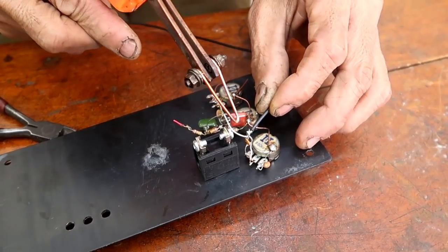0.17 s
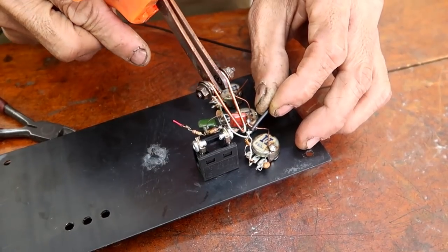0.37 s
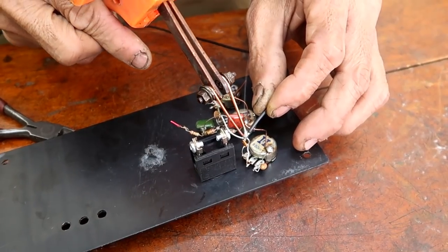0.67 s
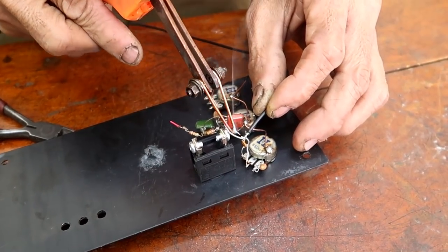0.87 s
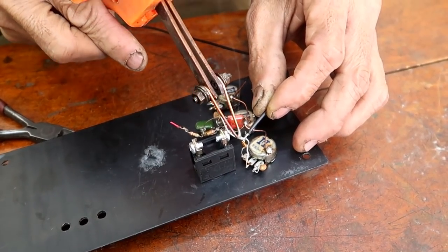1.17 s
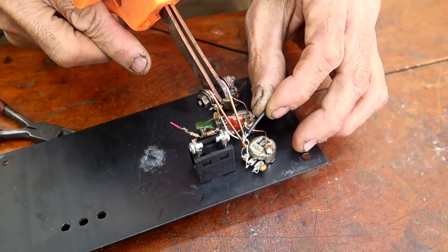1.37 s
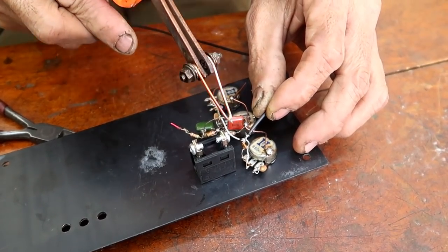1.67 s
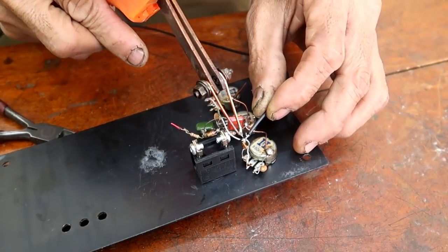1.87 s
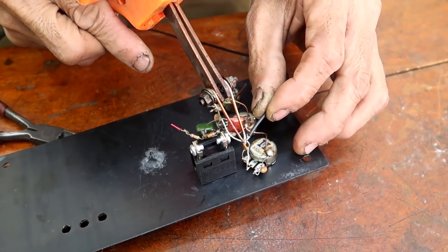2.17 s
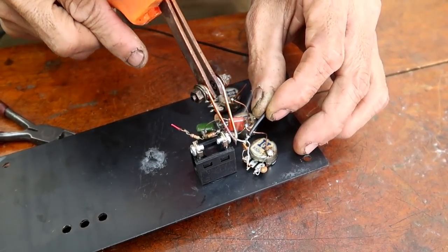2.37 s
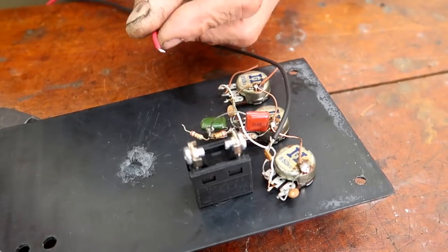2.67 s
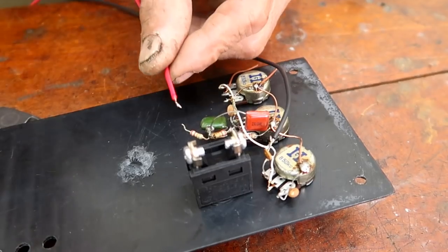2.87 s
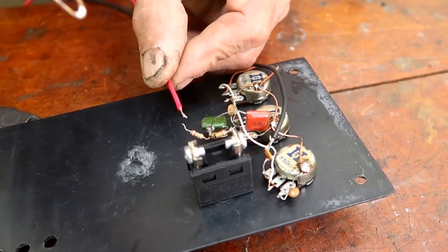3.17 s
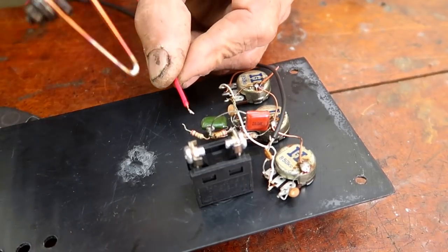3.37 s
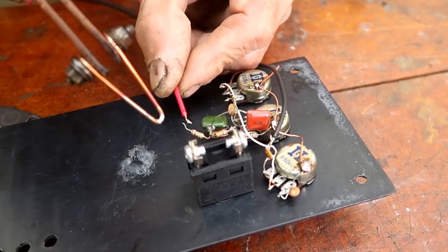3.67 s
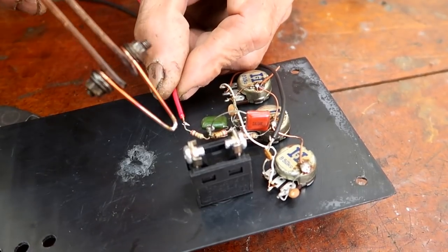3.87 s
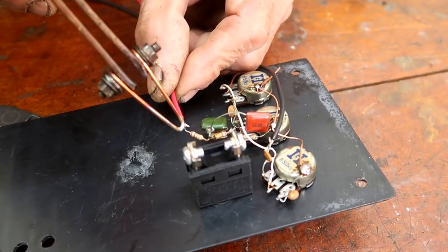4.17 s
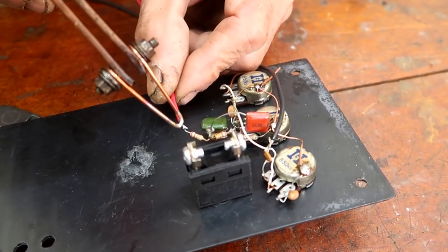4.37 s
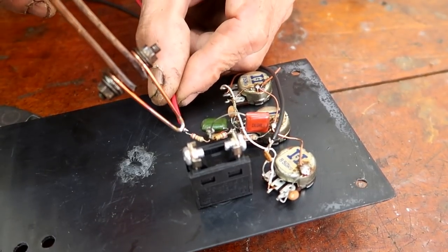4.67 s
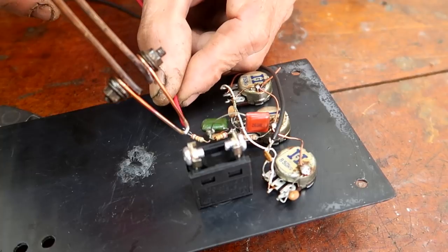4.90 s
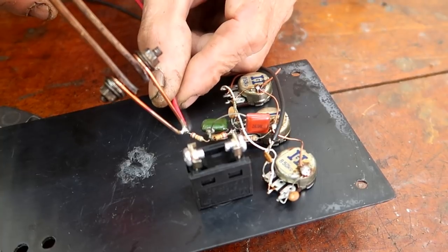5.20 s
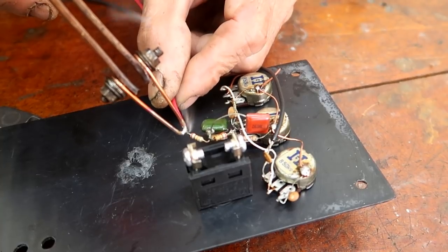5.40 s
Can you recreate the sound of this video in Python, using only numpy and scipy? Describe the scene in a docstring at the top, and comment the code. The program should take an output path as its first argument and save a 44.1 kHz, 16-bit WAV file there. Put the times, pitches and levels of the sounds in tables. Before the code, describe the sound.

Three harsh 100-hertz buzzes with sharp trigger clicks, a hard slam and rattle between the second and third, over faint birdsong and distant engine rumble.

```python
"""A buzzing soldering gun on a bench

A transformer soldering gun buzzes in three bursts: its core plates slap twice per mains cycle and shake the casing.
Its trigger clicks on and off, and once it is put down hard; soft bumps, thuds and rattles come from the bench.
Birds chirp outside an open shed and a far engine drones over rumble and thin air, made of coloured noise.
Two spaced microphone ports pick it up; the level drops out briefly at 2.58 s and the background changes.
"""
import sys
import numpy as np
from scipy import signal
from scipy.fft import rfft, irfft, next_fast_len
from scipy.io import wavfile
from scipy.ndimage import uniform_filter1d, map_coordinates

SR = 44100
rng = np.random.default_rng(int(sys.argv[2]) if len(sys.argv) > 2 else 0)


def pcm_store(signal):
    """Save signal as 16-bit PCM."""
    levels = np.round(np.clip(np.atleast_2d(signal), -1, 1) * 32767)
    wavfile.write(sys.argv[1], SR, levels.astype(np.int16).T)


def magnitude_from_level(level_db):
    """Linear magnitude for a level in decibels (20 dB per decade)."""
    exponent = np.asarray(level_db, float) / 20
    return 10 ** exponent


N = 244252
T = np.arange(N) / SR
SIDE = np.array([[.5], [-.5]])  # left and right port: each takes half of a difference

# The sound drops out and comes back: (time [s], level [dB])
DROPOUT = [(2.5833, 2), (2.5835, -16), (2.597, 8.5), (2.611, -0.5)]
# How much earlier the gun reaches the left port: before the dropout, after it [s]
GUN_LAG_S = [0.000372, 4.5e-5]
# Resonances of the bench top: (frequency [Hz], level [dB], time to fade by 60 dB when struck [s])
BENCH_MODES = [(250, -6, .026), (330, -2, .026), (440, 2, .028), (700, -6, .016), (1200, -2, .012),
               (1630, 1, .014), (2100, -1, .011), (2900, -6, .01), (3700, -6, .01), (4700, -8, .01),
               (5300, -10, .01), (7350, -18, .01)]


def unit(x):
    """Scale a signal to rms 1."""
    return x / np.sqrt(np.mean(x ** 2) + 1e-20)


def along(points, hz):
    """Read a curve of (Hz, value) points on a log frequency axis."""
    f, v = np.transpose(points)
    return np.interp(np.log(hz + 1), np.log(f + 1), v)


def curves(rows):
    """One value per sample for each column after the time."""
    s, *cols = np.transpose(rows)
    return [np.interp(T, s, c) for c in cols]


def wobble(rate, size=N):
    """A smooth random curve through `rate` random points a second."""
    points = rng.standard_normal(int(size * rate / SR) + 4)
    return map_coordinates(points, [np.arange(size) * rate / SR])


def moved(before, after):
    """One value or signal up to the dropout, another after it."""
    return np.where(T < DROPOUT[1][0], before, after)


def filtered(x, response):
    """Filter x by a complex response, given as a function of frequency."""
    m = next_fast_len(x.shape[-1] + 8192)
    return irfft(rfft(x, m) * response(np.fft.rfftfreq(m, 1 / SR)), m)[..., :x.shape[-1]]


def resonance(f, centre, width):
    """Response of a damped mass on a spring: 1 at its centre, falling on both sides (all in Hz)."""
    return 1j * f * width / (centre ** 2 - f * f + 1j * f * width)


def add(track, s, sound):
    """Mix a sound in at time s."""
    part = track[..., round(s * SR):][..., :sound.shape[-1]]
    part += sound[..., :part.shape[-1]]


def ports(x, pan_db, lag_s):
    """A source as the two ports hear it: louder by pan_db and earlier by lag_s on the left."""
    return filtered(x, lambda hz: magnitude_from_level(SIDE * pan_db) * np.exp(2j * np.pi * hz * lag_s * SIDE))


def blend(pair, alike, spectrum=((1, 0),)):
    """Mix two unrelated signals into left and right of a given likeness and colour."""
    def shares(hz):
        angle = np.arccos(np.clip(along(alike, hz), -1, 1)) / 2
        return magnitude_from_level(along(spectrum, hz)) * [np.cos(angle), np.sin(angle)]

    mid, side = filtered(pair, shares)
    return np.array([mid + side, mid - side])


def echoes(x, t60s, alike, size=SR // 4):
    """A diffuse tail per port, each frequency dying at its own speed, drawn anew every size samples."""
    out = np.zeros((2, N))
    for start in range(0, N, size):
        hz, t, z = signal.stft(rng.standard_normal((2, SR)), SR, nperseg=256)
        fade = magnitude_from_level(-60 * t / along(t60s, hz)[:, None])
        tail = blend(signal.istft(z * fade, SR, nperseg=256)[1], alike)
        tail = tail / np.linalg.norm(tail[0])
        # the tail begins 8 ms after the sound
        add(out, start / SR + .008, signal.fftconvolve(x[None, start:start + size], tail, axes=1))
    return out


def ring(modes, t, scatter_db):
    """Struck resonances that ring and fade, each at a new random strength."""
    hz, db, t60 = np.transpose(modes)[:, :, None]
    db = db + scatter_db * rng.standard_normal(hz.shape)
    return magnitude_from_level(db - 60 * t / t60) * np.sin(2 * np.pi * hz * t)


def rush(spectrum, patchy_db):
    """Coloured stereo noise of rms 1, with patches of random gain in time and frequency."""
    # Left-right likeness before and after the dropout, a list each: (frequency [Hz], likeness [-1 to 1])
    likeness = [
        [(60, 0.49), (380, -0.081), (2380, -0.13), (15000, -0.18)],
        [(60, 1.0), (180, 0.94), (550, 0.14), (1650, 0.27), (4970, 0.22), (15000, 0.01)],
    ]
    z = signal.stft(rng.standard_normal((2, N)), nperseg=512)[2]
    field = uniform_filter1d(rng.standard_normal(z.shape[1:]), size=6, axis=0)
    field = uniform_filter1d(field, size=14, axis=1)
    pair = signal.istft(z * magnitude_from_level(patchy_db * unit(field)), nperseg=512)[1][:, :N]
    before, after = [blend(pair, alike, spectrum) for alike in likeness]
    return unit(moved(before, after))


def background():
    """Low rumble and thin outdoor air are noise; the engine is a wavering tone at its firing rate and its double."""
    # Slow course of the levels: (time [s], rumble level [dB], air level [dB])
    floor = [(0, -52.5, -53.5), (.2, -50, -58.5), (2.3, -49, -57.5), (2.85, -50, -55), (5.54, -48, -56)]
    # Colour of the rumble, then of the air: (frequency [Hz], relative level per Hz [dB])
    rumble_colour = [(12, -65), (22, -14), (45, -3), (71, -2.5), (135, -8), (163, -9), (232, -12.5),
                     (325, -15), (500, -19.5), (650, -59), (1100, -120)]
    air_colour = [(180, -37), (300, -17), (415, -21), (556, -13), (820, -12.5), (965, -12), (1050, -15),
                  (1470, -17.5), (2210, -19.5), (3370, -22.5), (5840, -28.5), (14500, -41)]
    rumble_db, air_db = curves(floor)
    # each pair: before the dropout, after it
    firing_hz = 83.5 + moved(4.13, 1.24) * wobble(25.1)
    swell_db = moved(2, 3.25)
    turn = 2 * np.pi * np.cumsum(firing_hz) / SR
    firing = magnitude_from_level(moved(-56.5, -49) + swell_db * wobble(7)) * np.sin(turn)
    double = magnitude_from_level(moved(-55.5, -70) + swell_db * wobble(7.43)) * np.sin(2 * turn)
    drone = firing + double
    drone = moved(ports(drone, pan_db=1.5, lag_s=0.0014), drone)
    rumble = magnitude_from_level(rumble_db) * rush(rumble_colour, patchy_db=1.15)
    return rumble + magnitude_from_level(air_db) * rush(air_colour, patchy_db=1.5) + drone


def birds():
    """Each note is a gliding tone of wavering pitch and strength, heard directly and through the yard's echoes."""
    # Clear, level whistles: (time [s], length [s], pitch [Hz], level [dB])
    whistles = [(0.623, 0.11, 4300, -63), (0.884, 0.078, 4270, -63), (0.905, 0.14, 3754, -61),
                (1.239, 0.047, 3900, -52.5), (2.807, 0.19, 3370, -55), (3.151, 0.069, 4400, -56.5),
                (3.241, 0.051, 4287, -53.5), (3.459, 0.091, 4100, -53.5), (3.642, 0.046, 2630, -60),
                (3.682, 0.039, 3010, -60), (3.796, 0.065, 2940, -50)]
    # Hoarse, gliding chirps: (time [s], length [s], start pitch [Hz], end pitch [Hz], level [dB])
    chirps = [(0, 0.021, 3680, 3600, -61.5), (0.161, 0.094, 3400, 3500, -68),
              (0.378, .07, 4290, 4300, -57.5), (0.349, 0.13, 2660, 3320, -59),
              (0.499, 0.19, 4600, 4480, -60), (0.702, 0.066, 4450, 4980, -57.5),
              (0.765, 0.14, 4000, 3610, -59), (1.003, .043, 3300, 2900, -60),
              (1.103, .075, 3430, 2900, -56.5), (1.2, 0.056, 3110, 3800, -63.5),
              (1.475, 0.088, 3400, 3480, -67), (3.078, 0.076, 5000, 4440, -59),
              (3.369, 0.091, 4600, 5300, -54), (3.466, 0.08, 5300, 5050, -66),
              (3.593, 0.14, 4240, 4200, -54), (3.725, 0.11, 4360, 3180, -53),
              (3.994, 0.14, 3500, 3210, -51.5)]
    # One nearer bird repeats the same rising cheep: (time [s], level [dB])
    cheeps = [(1.864, -43.5), (2.106, -46), (2.334, -45.5)]
    # Echoes of the yard: (frequency [Hz], time to fade by 60 dB [s])
    yard = [(2000, 1), (6000, 0.56)]
    clear_hz, hoarse_hz, cheep_hz = 51.6, 205, 174  # how far the pitch wavers
    notes = [(s, length, hz, hz, db, clear_hz) for s, length, hz, db in whistles]
    notes += [(*row, hoarse_hz) for row in chirps]
    notes += [(s, 0.034, 3650, 4000, db, cheep_hz) for s, db in cheeps]
    out = np.zeros(N)
    for s, length, from_hz, to_hz, db, waver_hz in notes:
        u = np.linspace(0, 1, round(length * SR))
        hz = from_hz + (to_hz - from_hz) * u + waver_hz * wobble(457.2, size=len(u))
        strength = magnitude_from_level(db + 3.9 * wobble(60.0, size=len(u))) * np.sin(np.pi * u) ** 0.62
        add(out, s, strength * np.sin(2 * np.pi * np.cumsum(hz) / SR))
    direct = magnitude_from_level(2.5) * ports(out, pan_db=-1.0, lag_s=-0.000056)
    return direct + magnitude_from_level(1.0) * echoes(out, yard, alike=[(1, 0.022)])


def bumps():
    """Soft bumps, and one faint high hiss at the start: noise through the board, each around its own pitch."""
    # The hiss, then the bumps: (time [s], level [dB], length [s], centre [Hz], left minus right [dB])
    noises = [(0.03, -76, 0.54, 6760, 1), (0.061, -64, 0.086, 660, -2.5), (0.135, -66, 0.051, 850, -1.5),
              (0.725, -62.5, 0.19, 540, 2), (0.991, -63, 0.039, 880, -8), (2.344, -55, 0.033, 890, -0.5),
              (2.373, -47, 0.0096, 750, 8.5), (2.384, -55, 0.015, 695, -14), (2.866, -49.5, 0.045, 1200, 3),
              (2.946, -50.5, 0.01, 298, 0), (2.999, -48.5, 0.13, 1110, -0.5), (3.178, -61, 0.013, 1670, -5),
              (2.878, -47, 0.024, 417, 1), (2.993, -59, 0.052, 2550, 1), (4.802, -51.5, 0.19, 656, 0),
              (4.949, -42, 0.037, 975, -0.5), (4.964, -48, 0.028, 507, 2.5), (5.128, -46.5, 0.043, 768, 2)]

    def board(f):
        # resonances broader than those of the struck board, with alternating signs
        return sum((-1) ** k * magnitude_from_level(db) * resonance(f, c, 5 / t60) for k, (c, db, t60) in enumerate(BENCH_MODES))

    out = np.zeros((2, N))
    for s, db, length, hz, pan_db in noises:
        u = np.arange(round(length * SR) + 2000) / (length * SR)
        swell = np.sin(np.pi * np.clip(u, 0, 1) ** 0.62)
        grit = rng.standard_normal(len(u)) * magnitude_from_level(1.8 * wobble(185, size=len(u))) * swell
        sound = filtered(grit, lambda f: board(f) * resonance(f, hz, 1.1 * hz) ** 3)
        add(out, s, magnitude_from_level(db) * ports(unit(sound), pan_db, lag_s=1.5e-5))
    return out


def trigger():
    """The switch snaps over and rebounds once; so small a part gives no bass."""
    # Resonances of the trigger plastic: (frequency [Hz], level [dB], time to fade by 60 dB [s])
    plastic = [(1404, 5.5, 0.021), (1650, -1.5, 0.028), (1990, -24, 0.0039), (2550, 3, 0.0059),
               (2900, 0, 0.013), (3400, -4.5, 0.012), (4400, -3.5, 0.007), (5300, -2.5, 0.011),
               (5760, -3.5, 0.012), (6970, -12, 0.019), (9340, -14.5, 0.012)]
    # It takes up its slack, snaps on, snaps off: (time [s], peak level before the bass is cut [dB])
    slack = [(0.4148, -29.5), (4.0323, -25.5)]
    snap_on = [(0.4536, -20.5), (2.002, -20.5), (4.154, -14.5)]
    snap_off = [(0.868, -14.5), (2.5564, -18)]
    # Colour of those three kinds: (modes over 5 kHz [dB], modes under 2 kHz [dB])
    colours = [(-6.5, -2), (0.5, -10), (-7, -18)]
    out, t = np.zeros(N), np.arange(1500) / SR
    hz = np.transpose(plastic)[0][:, None]
    kinds = zip([slack, snap_on, snap_off], colours)
    clicks = [(*row, *colour) for rows, colour in kinds for row in rows]
    for s, db, treble_db, low_db in clicks:
        tilt_db = np.where(hz > 5000, treble_db, np.where(hz < 2000, low_db, 0))
        snap = (magnitude_from_level(tilt_db) * ring(plastic, t, scatter_db=2)).sum(0)
        snap += magnitude_from_level(treble_db - 5.5 - 60 * t / 0.009) * rng.standard_normal(len(t))  # broad crack
        snap *= (1 - np.exp(-t / 0.00051)) * (1 + .5 * wobble(1650, size=len(t)))  # gritty contact
        snap *= magnitude_from_level(db) / np.abs(snap).max()
        add(out, s, snap)
        add(out, s + 0.0095, magnitude_from_level(-17.5) * snap)  # rebound
    return filtered(out, lambda f: (1j * f / (700 + 1j * f)) ** 2)


def drive(on, off, loose, settle):
    """One sharp slap per half mains cycle; loose plates slap unevenly and rattle after it."""
    slap_hz = 100.285
    t = T[round(on * SR):round(off * SR)]
    cycle = t * slap_hz + .24
    whole = np.arange(np.ceil(cycle[0]), cycle[-1])[:, None]
    size_db, shift = rng.standard_normal((2, len(whole), 1))
    # each slap is a short windowed sinc, so that it can fall between two samples
    at = (whole - cycle[0]) / slap_hz * SR + 3 * loose * shift
    taps = np.floor(at) + np.arange(-7, 9)
    shape = np.sinc(taps - at) * np.cos(np.pi * (taps - at) / 16) ** 2 * magnitude_from_level(6 * loose * size_db)
    slaps = np.bincount(np.clip(taps, 0, len(t) - 1).astype(int).ravel(), shape.ravel(), len(t))
    after_slap = .28 + magnitude_from_level(-28 * (cycle % 1))
    rattle = rng.standard_normal(len(t)) * after_slap * magnitude_from_level(5 * loose * wobble(40, size=len(t)))
    share = np.clip(loose + (1 - loose) * np.exp(-(t - on) / settle), 0, 1)  # the inrush shakes the plates
    return t, np.sqrt(1 - share) * unit(slaps) + np.sqrt(share) * unit(rattle)


def casing(shake, modes, sway_db, lag_s):
    """The shaking through the gun's steep resonances, each with its own time shift, direction and slow sway."""
    out = 0
    for k, (c, width, db, ms, pan_db) in enumerate(modes):
        def mode(f):
            shift_s = ms / 1000 - SIDE * lag_s
            return resonance(f, c, 1.5 * width) ** 2 * np.exp(-2j * np.pi * f * shift_s)

        level = magnitude_from_level(db + SIDE * pan_db + sway_db * wobble(8.3, size=len(shake)))
        out = out + (-1) ** k * level * filtered(shake, mode)
    return unit(out)


def buzz():
    """The core shakes the casing for as long as the trigger is held."""
    # Trigger held: (on [s], off [s], looseness of the plates [0 to 1], time to settle [s])
    bursts = [(.458, .868, .3, .04), (2.004, 2.556, .35, .04), (4.158, 5.6, .1, .06)]
    # Level of each burst [dB]
    burst_db = [-50, -49.5, -43.5]
    # Casing resonances, gun pointing down, then held flat, and that of one loose plate: (frequency [Hz],
    # width [Hz], level [dB], time shift against the slap, later or earlier [ms], left minus right [dB])
    steep = [(850, 130, -1, 0.32, 0.5), (2150, 220, -6.5, 1.68, 0), (2433, 35, -1.5, 1.5, 16),
             (2750, 78, -6, 1.6, -11), (3070, 140, -4.5, 1.46, 1), (3383, 93, 0.5, 1.39, 3),
             (4000, 220, -11.5, 0, -13), (4600, 200, -5, 0.16, 8.5), (5190, 190, -19, 0.05, -6),
             (5800, 390, -10, 0.12, -6), (6370, 480, -13, 0.29, 11.5), (7220, 150, -14.5, 0.3, -5),
             (8240, 300, -12, 0, -1.5), (9530, 1100, -17, 0, 2), (11500, 130, -14.5, 0.28, 6),
             (12400, 400, -20, 0.14, 1), (13600, 3500, -31, 0, -3)]
    flat = [(850, 100, -2.5, 1.5, 1), (1075, 84, -5.5, 3, 1), (1490, 194, -10.5, 3.5, 0.81),
            (1820, 100, -7, -2.5, 1), (2204, 90, -2.5, 4, 1), (2338, 88, -2.5, 5, 1),
            (2492, 77, -1, 1.8, 1), (2725, 69, -6, 4, 1), (2940, 220, -12.5, 3.5, 1),
            (3400, 240, 1, 2.5, 1), (3613, 113, -4.5, 3.5, 1), (4600, 810, -11, 0, 1),
            (5300, 250, -8, -0.5, 1), (6340, 650, -6.5, 1.5, 1), (7790, 240, -7, -1.5, 1),
            (8620, 390, -13, -3, 1), (10400, 1000, -6, -1.5, 1), (12300, 280, -25, -18, 1),
            (13600, 350, -17.5, -0.5, 1)]
    plate_mode = [(1627, 150, 0, 0.049, 1.5)]
    # The plate sings in the two bursts with the gun pointing down: level in each [dB]
    plate_levels = [-56, -56.5]
    # Gaps in the plate's 1.6 kHz tone: (time [s], depth [dB], half width [s])
    tone_gaps = [(.658, 35, .026), (.764, 14, .014), (2.04, 6, .015), (2.494, 8, .015)]
    out = np.zeros((2, N))
    rows = zip(bursts, burst_db, [steep, steep, flat], [*plate_levels, -np.inf])
    for burst, db, modes, plate_db in rows:
        on, _, loose, _ = burst
        t, shake = drive(*burst)
        lag_s = GUN_LAG_S[int(on > DROPOUT[0][0])]
        sound = magnitude_from_level(db) * casing(shake, modes, sway_db=.5 + 4 * loose, lag_s=lag_s)
        gaps_db = sum(depth * np.exp(-((t - s) / width) ** 2) for s, depth, width in tone_gaps)
        plate = casing(shake, plate_mode, sway_db=2.1, lag_s=GUN_LAG_S[1])
        sound += magnitude_from_level(plate_db - gaps_db) * plate
        add(out, on, np.clip((t - on) / 0.00048, 0, 1) * sound)
    return out


def thuds():
    """A soft, uneven push rings the few low resonances of the bench frame."""
    # Dull thuds: (time [s], level of the push [dB], length [s])
    pushes = [(1.918, -52, 0.062), (2.375, -41, 0.013), (4.28, -50, 0.051), (4.978, -37, 0.037),
              (5.043, -39, 0.023), (5.146, -41, 0.066)]
    # Resonances of the frame: (frequency [Hz], width [Hz], level [dB])
    frame_modes = [(174, 47, -16.5), (210, 13, 1), (243.6, 38, -0.5), (348, 60, -16.5)]
    push = np.zeros(N)
    for s, db, length in pushes:
        u = np.linspace(0, 1, round(length * SR))
        add(push, s, magnitude_from_level(db) * np.sin(np.pi * u ** 0.34) * rng.standard_normal(len(u)))

    def frame(f):
        modes = sum((-1) ** k * magnitude_from_level(db) * resonance(f, c, w) for k, (c, w, db) in enumerate(frame_modes))
        return modes / (1 + 1j * f / 450) ** 2  # dulled above 450 Hz

    return filtered(push, lambda f: frame(f) / np.sqrt(np.mean(np.abs(frame(f)) ** 2)))


def slam():
    """A faint 5 ms hiss leads in, then the gun lands: a crack and the short ring of the board."""
    # Gun put down: (time [s], peak level before the bass is cut [dB])
    slam_s, slam_db = (2.6214, 2.6)
    out, t = np.zeros(N), np.arange(3000) / SR
    # a hard corner drives the high modes a little more
    hard = (np.transpose(BENCH_MODES)[0][:, None] / 1000) ** .13
    blow = (hard * ring(BENCH_MODES, t, scatter_db=1)).sum(0)
    blow += .25 * magnitude_from_level(-60 * t / .008) * rng.standard_normal(len(t))  # crack
    blow *= 1 - np.exp(-t / .0008)
    add(out, slam_s, blow / np.abs(blow).max() * magnitude_from_level(slam_db))
    lead_in = filtered(rng.standard_normal(240), lambda f: resonance(f, 2600, 2500))
    add(out, slam_s - .0055, magnitude_from_level(-32) * np.linspace(.3, 1, 240) * unit(lead_in))
    return filtered(out, lambda f: (1j * f / (185 + 1j * f)) ** 4)  # a thin board radiates no deep bass


def clatter():
    """Loose parts rattle: dense, throbbing grit, part dull and part bright, swells to each jolt and settles."""
    # Jolts: (time of the peak [s], level [dB], rise before it [s])
    jolts = [(2.639, -26, 0.0047), (2.882, -43, 0.0062), (2.954, -47.5, .012), (3.066, -48.5, 0.06)]
    settle_db_per_s, bright_share = 91.5, 0.53
    grit = rng.standard_normal((2, N)) * magnitude_from_level(2.4 * wobble(70))

    def band(f, top_hz):
        return 1j * f / (250 + 1j * f) / (1 + 1j * f / top_hz) ** 5

    dull = unit(filtered(grit[0], lambda f: band(f, 1270)))
    bright = unit(filtered(grit[1], lambda f: band(f, 4130)))
    shaking = 0
    for s, db, rise in jolts:
        settling = magnitude_from_level(db - settle_db_per_s * np.maximum(T - s, 0))
        shaking = shaking + np.clip(1 + (T - s) / rise, 0, 1) * settling
    return shaking * ((1 - bright_share) * dull + bright_share * bright)


def scene():
    """Gun and bench are near, in the echoing shed; birds and background are far."""
    # Direction of the slam: (frequency [Hz], left minus right [dB])
    slam_pan = [(60, -4), (380, -1.5), (700, 2), (1800, 3.5), (4400, 2.5), (15000, -1.5)]
    # Echoes of the shed: (frequency [Hz], time to fade by 60 dB [s])
    shed = [(150, 0.21), (500, 0.5), (2000, 0.56), (5000, 0.24), (12000, 0.2)]
    # Left-right likeness of those echoes: (frequency [Hz], likeness [-1 to 1])
    shed_alike = [(300, 0.98), (1500, 0.87), (5000, 0.87)]
    gun, switch, blow = buzz(), trigger(), slam()
    soft = bumps() + thuds() + ports(clatter(), pan_db=0.7, lag_s=3e-5)
    landed = filtered(ports(blow, 0, lag_s=GUN_LAG_S[1]), lambda hz: magnitude_from_level(SIDE * along(slam_pan, hz)))
    near = gun + ports(switch, pan_db=3.5, lag_s=2.8e-5) + landed + soft
    wet = magnitude_from_level(-18) * switch + magnitude_from_level(-16.0) * blow + magnitude_from_level(-12.5) * soft[0]
    hum = magnitude_from_level(-14) * echoes(gun[0], shed, shed_alike, size=N)  # one unchanging tail for the steady buzz
    return near + echoes(wet, shed, shed_alike) + hum + birds() + background()


def top_cut(x):
    """Nothing passes above the cut-off."""
    return signal.sosfilt(signal.butter(12, 16450, fs=SR, output="sos"), x)


def record(dry):
    """The level drops out briefly, loud peaks are softly flattened, and the treble ends near 15.6 kHz."""
    dropout_db, = curves(DROPOUT)
    heard = dry * magnitude_from_level(dropout_db)
    heard = heard / (1 + np.abs(heard / .97) ** 8) ** (1 / 8)
    heard = filtered(heard, lambda hz: 1 / (1 + (hz / 15600) ** 60))
    return top_cut(heard)


dry = scene()
out = record(dry)
pcm_store(out)
```